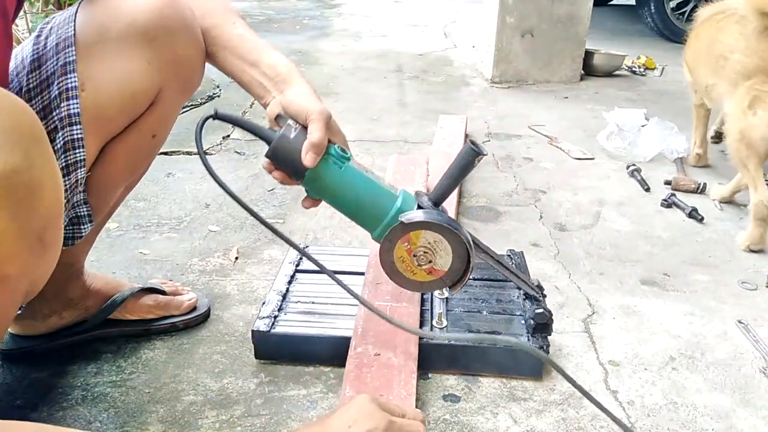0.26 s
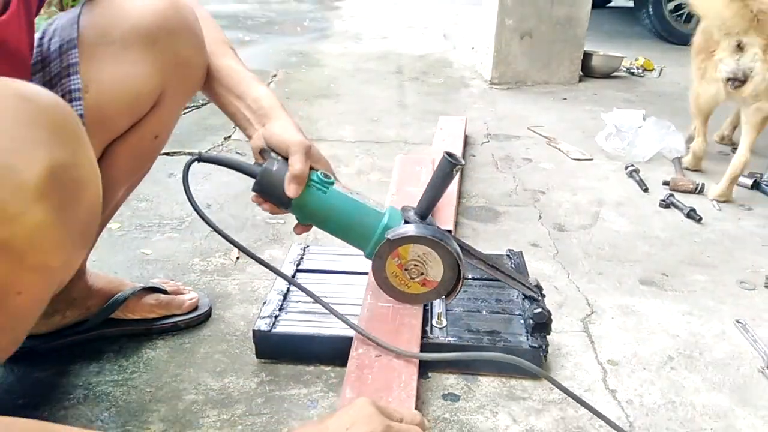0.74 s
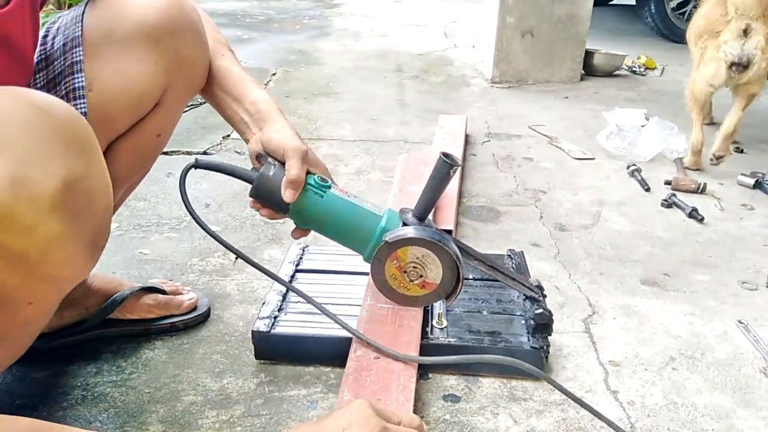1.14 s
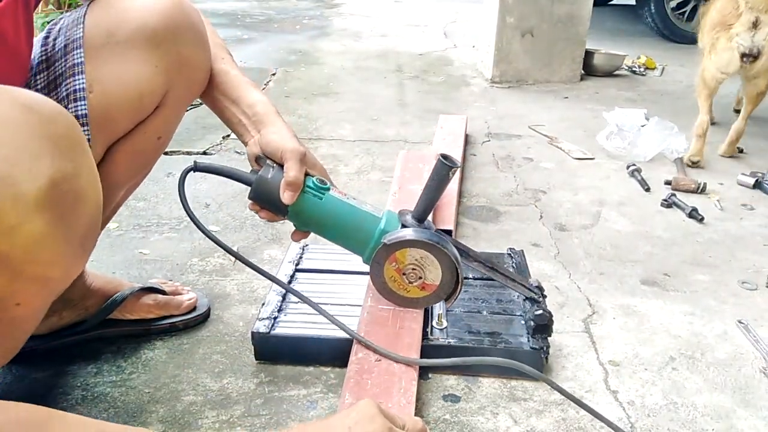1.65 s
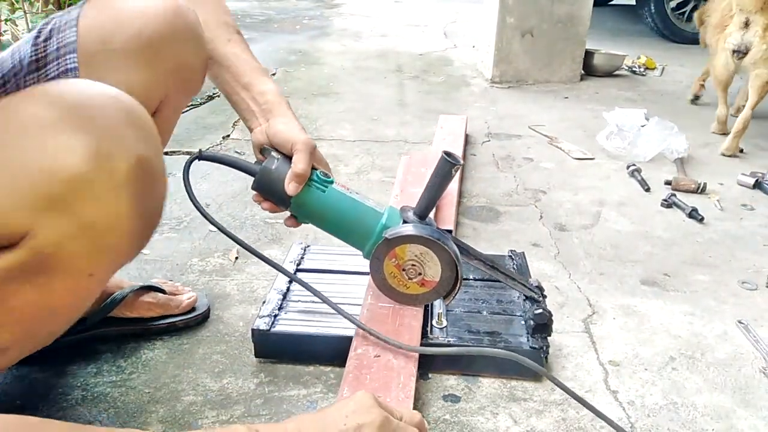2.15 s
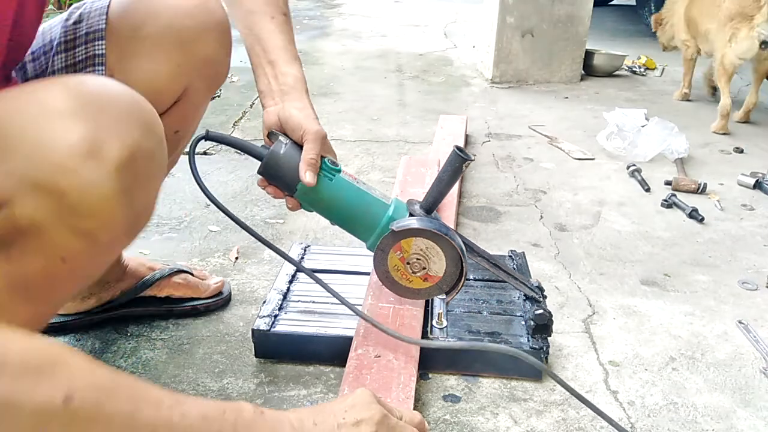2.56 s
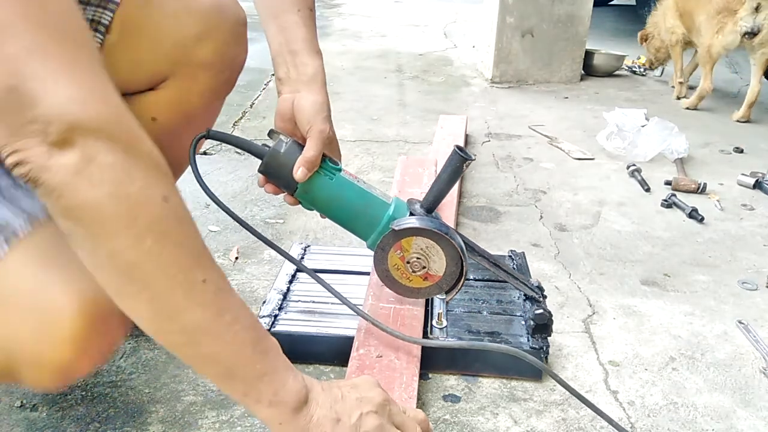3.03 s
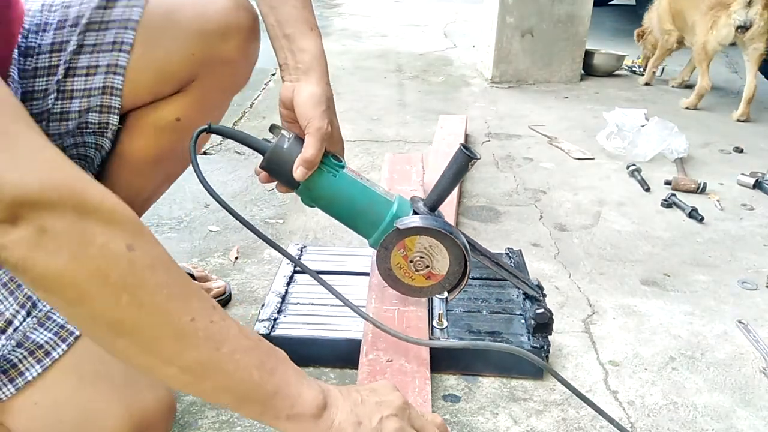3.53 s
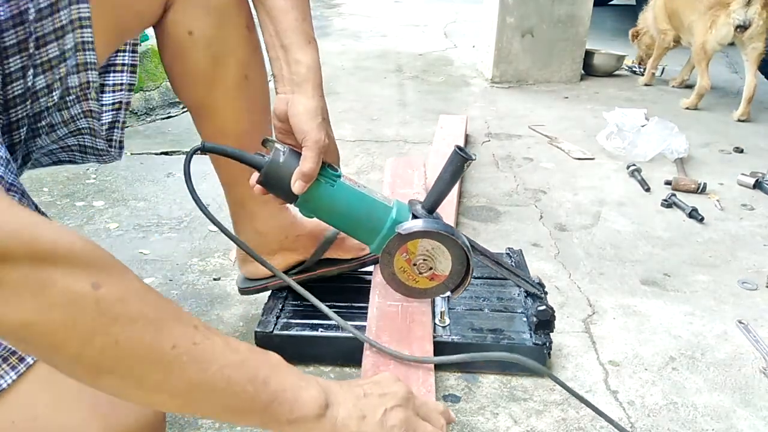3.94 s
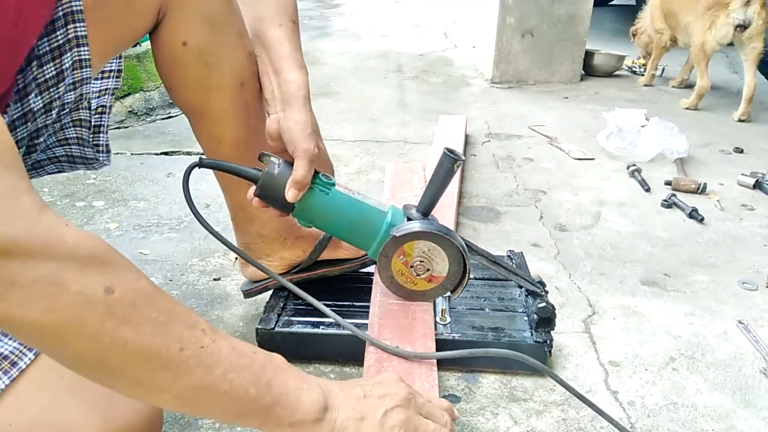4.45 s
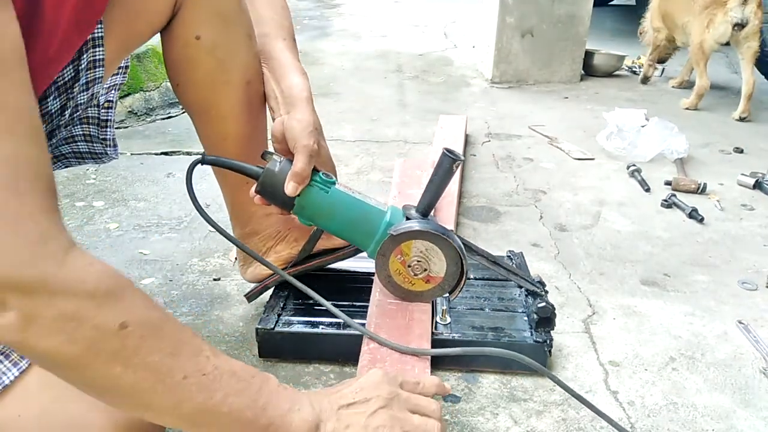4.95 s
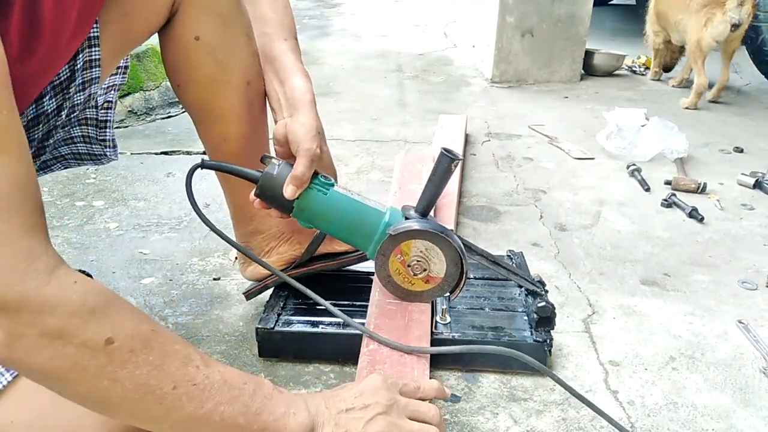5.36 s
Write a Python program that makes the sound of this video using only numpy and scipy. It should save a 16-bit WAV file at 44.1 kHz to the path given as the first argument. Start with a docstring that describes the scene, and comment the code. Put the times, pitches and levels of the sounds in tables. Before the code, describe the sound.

A steel tube is shifted on a metal stand, close by, over very faint outdoor air. It starts with a scrape and a small hollow clatter. Until about 2 seconds, irregular light knocks mix with groaning scrapes and brief squeals, with a sharper knock near 1.2 seconds. From 2.2 to 3.3 seconds, sandals scuff on gritty concrete, with one dry slap at 3 seconds and soft heel thumps. The tube slides again until about 3.6 seconds. Around 3.9 to 4.1 seconds, a foot comes down on the stand with a cluster of ringing clanks, the loudest moment, and a smaller cluster follows near 4.4 seconds. Around 5 seconds come more knocks, a short rasping scrape and a dull thump, thinning to scattered light clicks by 5.5 seconds. Hard workshop walls add a short reverberation to steel and feet.

```python
"""Over quiet outdoor air, a steel tube is slid into place on a metal stand in a workshop. For two seconds
it knocks and chatters, each impact exciting the steel's modes, and scrapes and squeals by stick-slip
friction. Sandals then scuff and slap the concrete, heels thump, and the tube slides again. Near four
seconds a foot comes down on the stand with loud clanks, and the tube settles in scattered clicks.
Throughout, the hard walls answer steel and feet with reverberation."""
import sys
import numpy as np
from scipy import signal
from scipy.fft import rfft, irfft, next_fast_len
from scipy.io import wavfile
from scipy.ndimage import uniform_filter1d, map_coordinates

SR = 44100
rng = np.random.default_rng(int(sys.argv[2]) if len(sys.argv) > 2 else 0)


def wrap_up_sound(samples):
    """Save the sound to the file named by the first command line argument, as 16-bit audio."""
    columns = np.atleast_2d(samples).T
    # keep every value between -1 and 1, then stretch to whole-number steps
    tamed = np.clip(columns, -1, 1)
    steps = np.round(tamed * 32767).astype(np.int16)
    wavfile.write(sys.argv[1], SR, steps)


N = 246519


def amp(db):
    """Decibels to amplitude ratio."""
    return 10 ** (np.asarray(db) / 20)


def along(points, hz):
    """Interpolation of (Hz, value) points on a logarithmic frequency axis."""
    freqs, values = np.transpose(points)
    return np.interp(np.log(hz + 1), np.log(freqs + 1), values)


def filtered(x, response):
    """Linear filtering: the spectrum of x times a frequency response."""
    size = next_fast_len(N + SR // 4)
    return irfft(rfft(x, size) * response(np.fft.rfftfreq(size, 1 / SR)), size)[..., :N]


def causal(gain):
    """Minimum phase: the most compact impulse response with this magnitude."""
    cepstrum = irfft(np.log(np.maximum(gain, 1e-6)))
    half = cepstrum.shape[-1] // 2
    cepstrum[..., 1:half] *= 2
    cepstrum[..., half + 1:] = 0
    return irfft(np.exp(rfft(cepstrum)))


def stroke(start, length, attack_s, t60):
    """Envelope of a stroke: pressure builds, holds, then decays exponentially."""
    t = np.arange(N) / SR - start
    return np.clip(t / attack_s, 0, 1) ** 2 * 1000 ** (-np.maximum(t - length, 0) / t60)


def strokes(rows, attack_s, t60):
    """Superposed strokes: one envelope per dB column of (start, length, dB, ..) rows."""
    return sum(np.outer(amp(levels), stroke(start, length, attack_s, t60))
               for start, length, *levels in rows)


# Stereo width. Each row: frequency in Hz, side over mid in dB.
SIDE_RATIO = [(60, -19), (130, -18), (260, -14), (520, -10.5), (1100, -6.5), (2200, -3.5), (4500, 1),
              (8000, 1.5), (13000, 0)]
def spread(hz):
    """Mid and side gains: the bass is near mono, the treble wide."""
    return np.array([np.ones_like(hz), amp(along(SIDE_RATIO, hz))])


def grit(size, rough_db, grain_hz):
    """Random amplitude modulation breaks mid and side noise into grains."""
    position = np.arange(size) * grain_hz / SR
    knots = rng.standard_normal(size)
    return rng.standard_normal((2, size)) * amp(rough_db * np.interp(position, np.arange(size), knots))


def rough_noise(spectrum, rough_db, grain_hz, resonance=np.ones_like):
    """Source and filter: grainy noise shaped by a spectrum and any resonance, with a mid of rms 1."""
    source = grit(N, rough_db, grain_hz)
    noise = filtered(source, lambda hz: amp(along(spectrum, hz)) * spread(hz) * resonance(hz))
    return noise / np.std(noise[0])


# The quiet yard beyond. Each row: frequency in Hz, spectral level in dB.
AIR_SPECTRUM = [(20, -14), (60, -8), (120, -3), (260, -7), (550, -1), (1000, 0), (2000, -6), (3800, -24),
                (8000, -20), (14000, -30)]
def air(level_db=-68):
    """Ambient noise: a faint broadband floor of outdoor air."""
    return amp(level_db) * rough_noise(AIR_SPECTRUM, rough_db=2, grain_hz=12)


# Decay of the room. Each row: frequency in Hz, t60 (time to fall 60 dB) in seconds.
ROOM_T60 = [(100, 0.69), (260, 0.7), (700, 0.39), (1840, 0.54), (4850, 0.58), (8000, 0.5), (12800, 0.56)]
# Strength of the reflections. Each row: frequency in Hz, gain in dB.
ROOM_TONE = [(100, 1), (300, 0.5), (600, 0.5), (1000, -0.5), (1700, 0), (3000, 2), (8000, 0), (14000, -4)]
def walls(x, build_s=0.00067, segments=14):
    """Diffuse reverberation: a decaying noise tail, drawn anew per segment as things move about."""
    out, t = np.zeros((2, N + SR)), np.arange(SR * 2 // 3) / SR
    for part in np.array_split(np.arange(N), segments):
        hz, age, noise = signal.stft(rng.standard_normal((2, len(t))), SR, nperseg=256)
        decay = 1000 ** (-age / along(ROOM_T60, hz)[:, None])
        tail = signal.istft(noise * decay, SR)[1][:, :len(t)] * (1 - np.exp(-t / build_s))
        echo = signal.fftconvolve(x[:, part], tail / np.linalg.norm(tail[0]), axes=1)
        out[:, part[0]:][:, :echo.shape[1]] += echo
    return filtered(out[:, :N], lambda hz: amp(along(ROOM_TONE, hz)))


# Rumble of the ground. Each row: frequency in Hz, spectral level in dB.
RUMBLE_SPECTRUM = [(20, -15), (50, -24), (90, 3.5), (180, 5.5), (300, -3.5), (500, -22), (1000, -61)]
# Shifts of weight. Each row: start in seconds, length in seconds, relative level in dB.
WEIGHT_SHIFTS = [(0.0, 0.021, -42), (0.25, 0.15, -51.5), (2.2, 0.194, -68), (3.26, 0.18, -47.5),
                 (3.72, 0.21, -48.5), (4.0, 0.11, -39), (4.35, 0.03, -35.5), (5.0, 0.13, -57)]
def rumble(gain_db=-1):
    """Forced vibration: shifting weight drives a dull rumble in the ground."""
    envelope, = strokes(WEIGHT_SHIFTS, attack_s=0.01, t60=0.53)
    return envelope * amp(gain_db) * rough_noise(RUMBLE_SPECTRUM, rough_db=8.5, grain_hz=43.2)


# Push of a heel. Each row: frequency as a multiple of its pitch, spectral level in dB.
HEEL_SPECTRUM = [(.2, -44.5), (.5, -14), (1, 2), (1.5, -9), (2.2, -16), (3.2, -28.5), (7, -47.5)]
# Soft footfalls. Each row: start in seconds, relative peak in dB, pitch in Hz, t60 in seconds.
FOOTFALLS = [(0.749, -48, 70.0, 0.18), (1.229, -47.5, 71, 0.12), (1.723, -51, 73, 0.25),
             (1.789, -52, 79.5, 0.22), (2.227, -47.5, 76.5, 0.16), (2.695, -46.5, 116, 0.073),
             (3.002, -34.5, 205, 0.36), (3.264, -23.5, 127, 0.071), (3.781, -55, 116, 0.14),
             (4.993, -23, 183, 0.035)]
def thumps(gain_db=1, shudder_db=-24, size=16384):
    """Soft impact: a heel gives one low-frequency pulse, and the ground shudders briefly."""
    hz, t = np.fft.rfftfreq(size, 1 / SR), np.arange(size) / SR
    mid = np.zeros(N + size)
    for start, db, pitch_hz, t60 in FOOTFALLS:
        push = amp(shudder_db) * rng.standard_normal(size) * 1000 ** (-t / t60)
        push[0] = 1  # the pulse ahead of the shudder
        thump = signal.fftconvolve(push, causal(amp(along(HEEL_SPECTRUM, hz / pitch_hz))))[:size]
        mid[round(start * SR):][:size] += amp(db + gain_db) * thump / np.abs(thump).max()
    return np.array([mid[:N], np.zeros(N)])


# Hiss and grind of a sole. Each row: frequency in Hz, spectral level in dB.
HISS_SPECTRUM = [(2060, -26), (3500, -3.5), (3930, -10), (4210, -5), (6070, 0), (6550, 2), (8120, 9),
                 (10500, -5.5), (14000, -14)]
GRIND_SPECTRUM = [(120, -66), (200, -27), (318, -5), (389, -10), (814, -11.5), (1540, 0.5), (2190, -10),
                  (2680, -1), (3110, -17), (3230, -55), (4000, -26), (5200, -62), (8800, -120)]
# Sliding soles. Each row: start and length in seconds, relative hiss and grind levels in dB.
SOLE_SLIDES = [(2.23, 0.13, -28, -35.5), (2.79, 0.092, -29.5, -43)]
def scuffs(gain_db=-1):
    """Roughness noise: a sole sliding over sandy concrete makes a stream of tiny contacts."""
    hiss_envelope, grind_envelope = strokes(SOLE_SLIDES, attack_s=0.069, t60=0.063)
    hiss = hiss_envelope * rough_noise(HISS_SPECTRUM, rough_db=-1.5, grain_hz=650)
    grind = grind_envelope * rough_noise(GRIND_SPECTRUM, rough_db=3.5, grain_hz=305)
    return amp(gain_db) * (hiss + grind)


def singing(rows, q):
    """Driven resonance: noise keeps a narrow band sounding for the length of each stroke."""
    out = np.zeros((2, N))
    for start, length, db, note_hz in rows:
        noise = rng.standard_normal((2, N))
        tone = filtered(noise, lambda hz: spread(hz) / (1 + (2 * q * (hz / note_hz - 1)) ** 2))
        out += amp(db) * stroke(start, length, attack_s=0.0063, t60=0.087) * tone / np.std(tone[0])
    return out


# Short damped resonances. Each row: start and length in seconds, relative level in dB, pitch in Hz.
DAMPED_NOTES = [(0.16, 0.095, -37.5, 269), (2.13, 0.047, -43, 302), (2.38, 0.047, -52, 356),
                (2.59, 0.06, -59, 468), (3.2, 0.053, -58, 2890), (2.86, 0.013, -37, 642),
                (3.15, 0.046, -46.5, 2740), (3.17, 0.134, -43.5, 650), (3.31, .03, -44, 2720)]
def damped_notes(gain_db=-4):
    """Damped resonance: the hollow body of the opening clatter, then rubbing soles."""
    return amp(gain_db) * singing(DAMPED_NOTES, q=7.1)


# Binding steel. Each row: start and length in seconds, relative level in dB, pitch in Hz.
STEEL_BINDS = [(0.55, 0.048, -51.5, 914), (0.619, 0.09, -36.5, 938), (1.18, 0.089, -43, 955),
               (1.37, 0.066, -46, 960), (1.55, 1, -64, 2057), (1.56, 0.41, -62.5, 956),
               (2.01, 0.1, -59, 930)]
def squeals(gain_db=-5):
    """Friction drives a sharp resonance where steel binds on steel."""
    return amp(gain_db) * singing(STEEL_BINDS, q=16)


# Modes of tube and stand. Each row: frequency in Hz, bandwidth in Hz, strength in dB.
STEEL_MODES = [(95.54, 1.2, 5), (499.4, 25, 4), (676, 23.5, 4.5), (823, 16, -8.5), (886.6, 21.6, 10.5),
               (956, 4.3, 14), (1019.4, 52, 12), (1110, 18, 13.5), (1190, 36, 9.5), (1506, 34, 0),
               (1715, 25, 7.5), (2043, 51, -3), (2240, 7, 1), (2490, 46, -3), (2953, 86, -2.5)]
def steel(hz):
    """Modal response: resonance peaks add in power over a flat floor."""
    return np.sqrt(1 + sum(amp(db) ** 2 / (1 + (2 * (hz - mode_hz) / width) ** 2)
                           for mode_hz, width, db in STEEL_MODES))


def slips(mean_gap_s=0.03, decay_s=0.0028, height_db=-8, count=600):
    """Relaxation oscillation: the gain jumps and decays each time the surface jerks free."""
    t = np.arange(N) / SR
    times = np.append(0, np.cumsum(mean_gap_s * (.5 + rng.random(count))))
    age = t - times[np.searchsorted(times, t, "right") - 1]
    jerk = 1 + amp(height_db) * np.exp(-age / decay_s)
    return jerk / np.sqrt(np.mean(jerk ** 2))


# Groan and rasp of sliding steel. Each row: frequency in Hz, spectral level in dB.
GROAN_SPECTRUM = [(150, -53), (250, -7), (415, 0.5), (485, 4), (788, 4), (920, -1), (1340, -10),
                  (1990, -8.5), (3500, -15), (4550, -21), (7700, -120)]
RASP_SPECTRUM = [(1180, -59), (2000, 5.5), (2150, 1), (2960, -2), (3230, -6.5), (4090, -10), (5810, -0.5),
                 (8520, 8.5), (14000, -15.5)]
# Drags of the tube. Each row: start and length in seconds, relative groan and rasp levels in dB.
TUBE_SLIDES = [(0.0, 0.12, -47.5, -49), (0.25, .22, -46.5, -57), (0.62, 0.065, -47.5, -59),
               (0.68, 0.089, -47.5, -51), (0.78, 0.11, -57, -58), (1.26, 0.025, -58, -64),
               (1.75, 0.099, -47.5, -50.5), (2.14, 0.066, -48, -46.5), (3.15, 0.41, -47.5, -48.5),
               (4.62, 0.27, -60.5, -51.5), (4.94, 0.073, -37, -27.5), (5.08, 0.076, -49, -50)]
def drag(gain_db=-1):
    """Stick-slip friction: the tube slides on the stand with a ringing groan under a fine rasp."""
    groan_envelope, rasp_envelope = strokes(TUBE_SLIDES, attack_s=0.0035, t60=0.048) * slips()
    groan = groan_envelope * rough_noise(GROAN_SPECTRUM, rough_db=4.5, grain_hz=123, resonance=steel)
    rasp = rasp_envelope * rough_noise(RASP_SPECTRUM, rough_db=8.5, grain_hz=323)
    return amp(gain_db) * (groan + rasp)


def contact_point(hz, depth_db=5, spacing_hz=135.8):
    """Modal coupling: each point of contact favours its own modes; in the treble they crowd and even out."""
    knots = np.clip(rng.standard_normal(2048), -1.6, 1.3)
    depth = depth_db * np.interp(hz, [2500, 5000], [1, .6])
    return amp(depth * map_coordinates(knots, [hz / spacing_hz]))


# Colour of a blow. Each row: frequency in Hz, spectral level in dB.
BLOW_SPECTRUM = [(25, -57.5), (60, -25), (100, -15), (200, -10.5), (400, -5.5), (700, 11), (1050, -5),
                 (1450, -6.5), (2700, -9.5), (3900, -19), (5500, -18.5), (8200, -7.5), (11000, -21.5),
                 (14000, -36)]
# Registers of a blow: clank, thud, crack and zing. Each row: lower and upper edge in Hz.
REGISTERS = [(350, 1400), (40, 350), (1400, 5000), (5000, 16000)]
# Grit crunching under steel or sole. Each row: start in seconds, relative level in dB, t60 in seconds.
GRIT_TICKS = [(0.06, -44, 0.042), (0.117, -34.5, .046), (0.244, -34.5, .06), (0.299, -34, 0.098),
              (1.376, -46.5, 0.1), (1.596, -54.5, 0.092), (1.802, -43, 0.14), (2.823, -35, 0.2),
              (2.881, -27.5, .06), (3.328, -38.5, 0.26), (3.762, -34.5, 0.1), (4.622, -38, 0.14),
              (4.711, -40.5, 0.13), (5.03, -23, 0.06), (5.395, -35, 0.088)]
# Shared by all ticks: offset of the middle register in dB, weight in dB, hollow note in Hz.
TICK_TIMBRE = (-7.5, -19.5, 720)
# Sharp knocks: steel on steel, and one dry sandal slap at three seconds.
# Each row: start in seconds, relative level in dB, hardness (treble lift) in dB,
# weight (bass lift) in dB, hollow note in Hz, t60 of the chatter in seconds.
SHARP_KNOCKS = [(0.154, -28, -25, -8, 1090, 0.029), (0.169, -25.5, -11, -7, 527, 0.16),
                (0.195, -27, 0, -9.5, 480, 0.056), (0.208, -20.5, -45, -14, 503, 0.047),
                (0.696, -31.5, -33, -27, 890, .08), (0.712, -41, -10, -15, 930, 0.053),
                (0.942, -33.5, -4, -11.5, 620, 0.033), (1.165, -18.5, -30.5, -45, 764, 0.035),
                (1.175, -19.5, -27.5, -52, 1540, 0.0257), (1.263, -32.5, -6.5, -20, 1620, 0.072),
                (1.441, -40.5, -25.5, -25, 940, 0.037), (1.568, -37.5, -32, -25, 1080, 0.097),
                (1.738, -41.5, -9.5, -18, 680, 0.051), (2.091, -31, -17, -23, 1810, 0.069),
                (2.995, -32.5, 2, -5, 5200, 0.017), (3.43, -28.5, -20, -33, 814, 0.16),
                (3.487, -30.5, -17.5, -17.5, 1880, .09), (3.681, -31, 1, -12, 1220, 0.012),
                (3.88, -23, -3.5, -5, 633, 0.055), (3.902, -10.5, -9, -15.5, 880, .06),
                (3.928, -12, 1.5, -13, 566, 0.091), (3.94, -12, -7, -13.5, 880, 0.34),
                (4.015, -0.5, -12, -60, 960, 0.21), (4.026, -5.5, -14.5, -13, 1200, 0.041),
                (4.037, -5.5, -10, -26, 746, 0.068), (4.052, -3.5, -11.5, -20, 850, 0.034),
                (4.338, -15, -3, -26, 970, 0.073), (4.349, -11.5, -12, -19.5, 770, 0.13),
                (4.38, -12.5, -26, -17, 760, 0.078), (4.434, -17, -32, -43, 790, 0.047),
                (4.785, -23, -9.5, -54, 1550, 0.078), (4.9, -19.5, -5.5, -25, 1650, 0.11),
                (4.93, -20, -29, -44, 790, 0.066), (4.958, -16, -1, -21.5, 1960, 0.046),
                (4.993, -17.5, -33, -32, 656, 0.05), (5.151, -27, -3.5, -29, 630, 0.062),
                (5.257, -35, 3.5, -16, 845, 0.051), (5.373, -42, 7, -42, 1100, 0.24),
                (5.519, -37, 1, -45, 1750, 0.054), (5.542, -35, -56, -33, 690, 0.024)]
def knocks(clank_db=-14, thud_db=-2, crack_db=-9.5, zing_db=-1, crack_share=0.37,
           hollow_db=4, hollow_q=4, rise_s=0.0039, size=8192):
    """Impact excitation: each knock or tick is a brief chatter, coloured by the modes of the steel."""
    hz, t = np.fft.rfftfreq(size, 1 / SR), np.arange(size) / SR
    padded = 2 * size
    bands = np.array([1 / np.sqrt((1 + (low / (hz + 1)) ** 10) * (1 + (hz / high) ** 10))
                      for low, high in REGISTERS])
    body = rfft(causal(bands[:, None] * spread(hz) * amp(along(BLOW_SPECTRUM, hz)) * steel(hz)), padded)
    middle_db, tick_weight_db, tick_hz = TICK_TIMBRE
    ticks = [(start, db + middle_db, -middle_db, tick_weight_db, tick_hz, t60)
             for start, db, t60 in GRIT_TICKS]
    out = np.zeros((2, N + padded))
    for start, db, hard_db, weight_db, note_hz, t60 in SHARP_KNOCKS + ticks:
        crack_lift = crack_share * hard_db + crack_db
        # a contact with more thud than crack lands softly and builds up slowly
        softness = np.clip(amp((weight_db - crack_lift) / 2), .1, 1.5)
        envelope = 1000 ** (-t / t60) * (1 - np.exp(-t / (rise_s * softness)))
        chatter = grit(size, rough_db=3, grain_hz=900) * envelope
        spot = causal(contact_point(hz))
        parts = irfft(rfft(chatter, padded) * rfft(spot, padded) * body)
        # rms of each register as if its energy lay within 15 ms
        strength = np.linalg.norm(parts, axis=(1, 2)) / np.sqrt(.015 * SR)
        balance_db = np.array([clank_db, weight_db + thud_db, crack_lift, hard_db + zing_db])
        blow = np.tensordot(amp(db + balance_db) / strength, parts, 1)
        hollow = causal(1 + amp(hollow_db) / np.hypot(1, 2 * hollow_q * (hz / note_hz - 1)))
        out[:, round(start * SR):][:, :padded] += irfft(rfft(blow) * rfft(hollow, padded))
    return out[:, :N]


# Stereo balance. Each row: frequency in Hz, left over right in dB.
BALANCE = [(100, 1.5), (1000, 1.5), (2200, 2), (4200, -0.5), (7500, 1.5), (13000, 9.5)]
def scene(metal_wet_db=-3, steps_wet_db=-7):
    """Superposition: steel, feet, reverberation and air add as mid and side, then form left and right."""
    metal = knocks() + drag() + squeals()
    steps = scuffs() + rumble() + thumps() + damped_notes()
    room = walls(amp(metal_wet_db) * metal + amp(steps_wet_db) * steps)
    mid, side = metal + steps + room + air()
    stereo = np.array([mid + side, mid - side])
    return filtered(stereo, lambda hz: amp(np.outer([.5, -.5], along(BALANCE, hz))))


# Threshold of the noise suppressor. Each row: frequency in Hz, level in dB.
GATE_THRESHOLD = [(100, -88.5), (500, -90), (1000, -85.5), (2000, -81), (4000, -83.5), (8000, -84.5),
                  (14000, -109)]
def suppressor(x, depth_db=-12, size=1024):
    """Spectral gating: each frequency is turned down while it stays under the threshold."""
    hz, _, spectra = signal.stft(x, SR, nperseg=size)
    power = np.mean(np.abs(spectra) ** 2, axis=0)
    smoothed = np.abs(uniform_filter1d(power, size=3, axis=1))
    opening = smoothed / (smoothed + amp(along(GATE_THRESHOLD, hz))[:, None] ** 2)
    return signal.istft(spectra * np.maximum(opening, amp(depth_db)), SR)[1][:, :N]


def record(dry, ceiling=.95, top_hz=14266):
    """Soft saturation: the microphone rounds the loudest clanks; gating and a band limit follow."""
    saturated = dry / (1 + np.abs(dry / ceiling) ** 5) ** (1 / 5)
    return filtered(suppressor(saturated), lambda hz: hz < top_hz)


dry = scene()
out = record(dry)
wrap_up_sound(out)
```